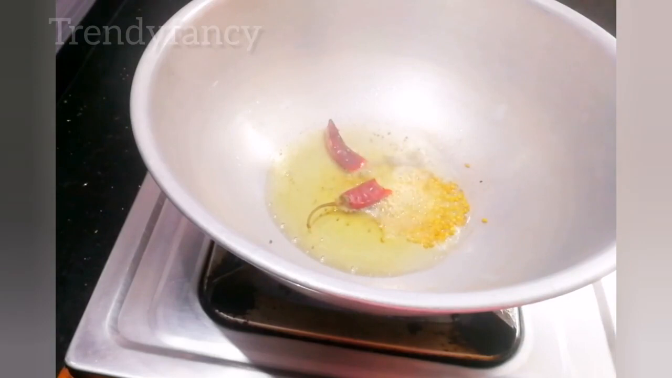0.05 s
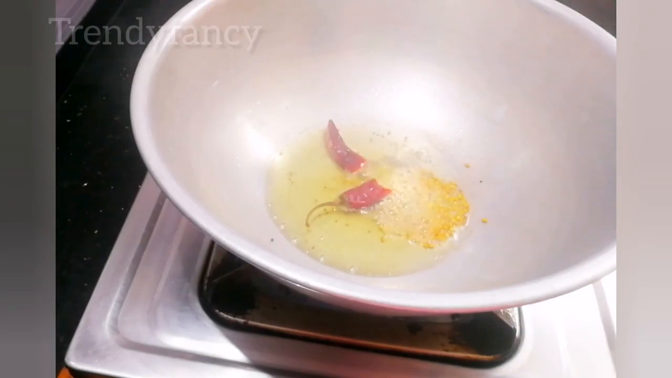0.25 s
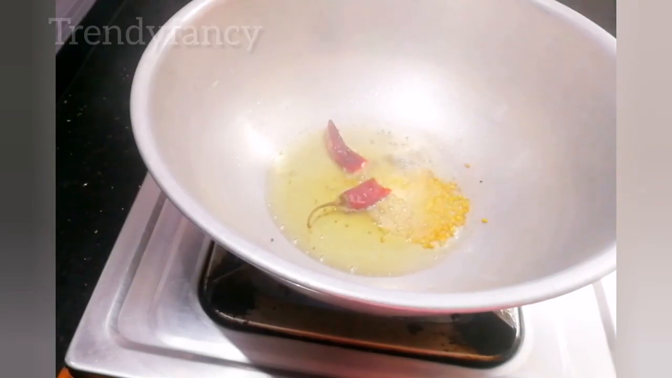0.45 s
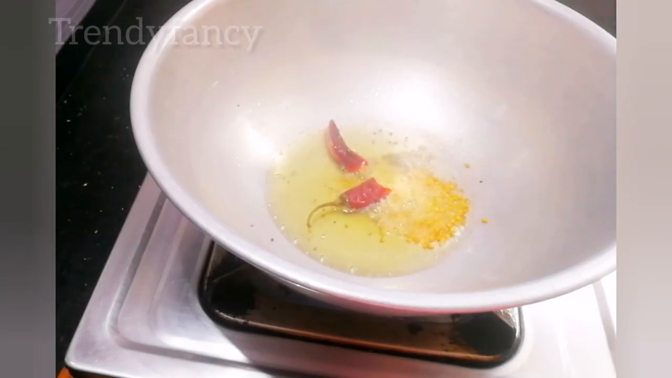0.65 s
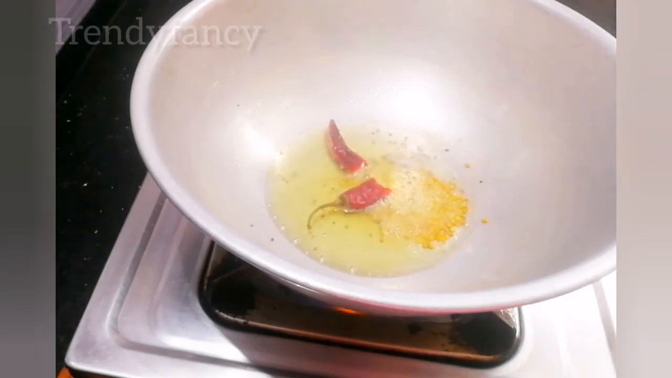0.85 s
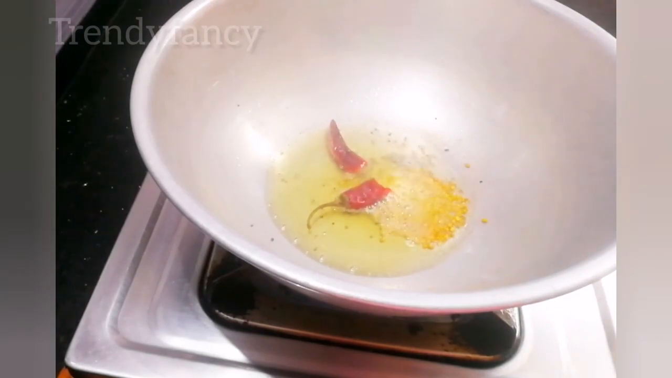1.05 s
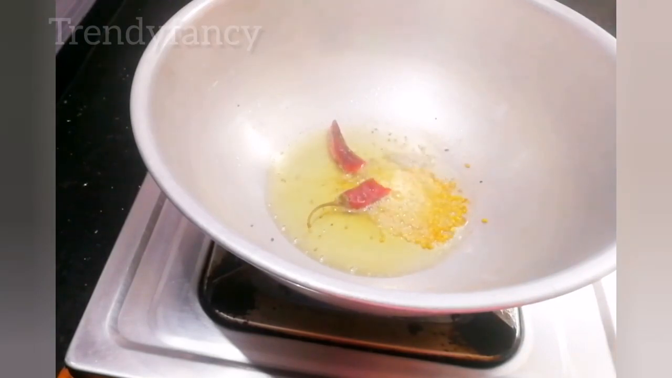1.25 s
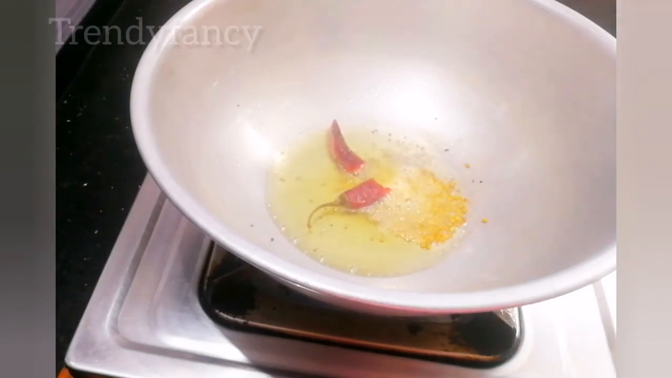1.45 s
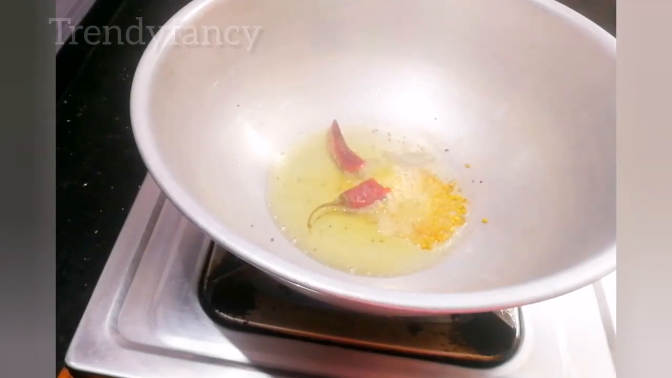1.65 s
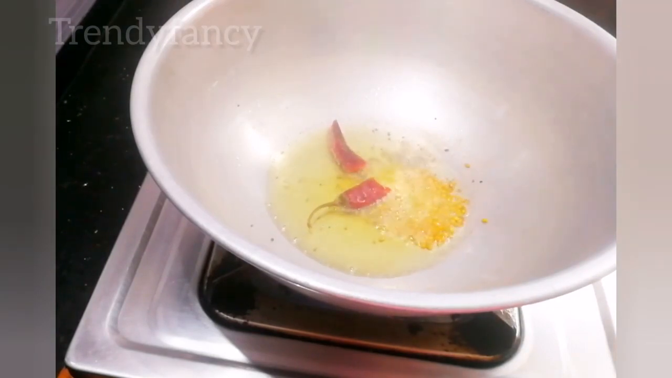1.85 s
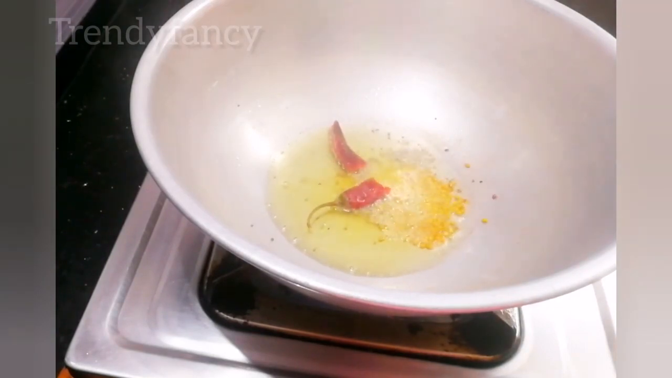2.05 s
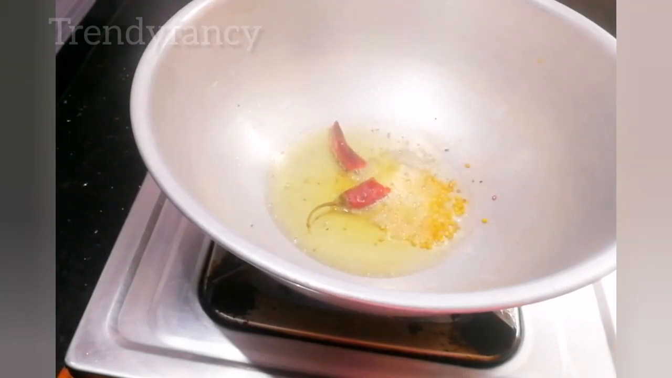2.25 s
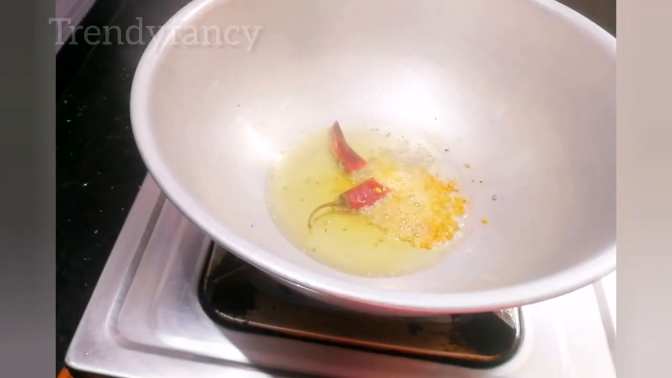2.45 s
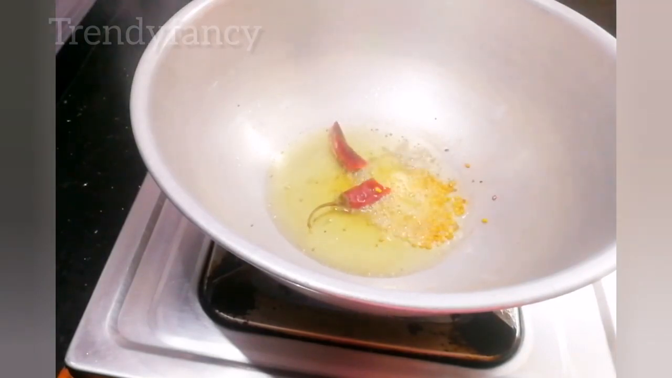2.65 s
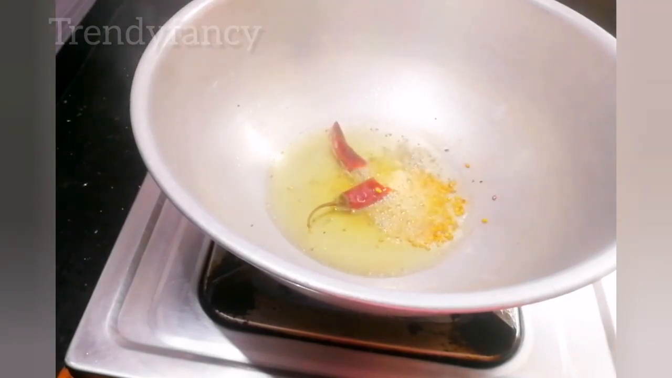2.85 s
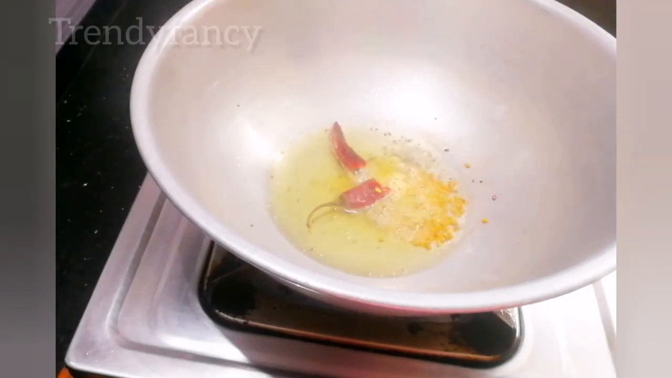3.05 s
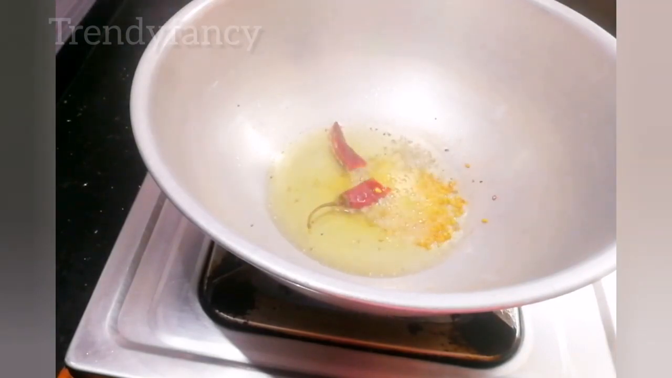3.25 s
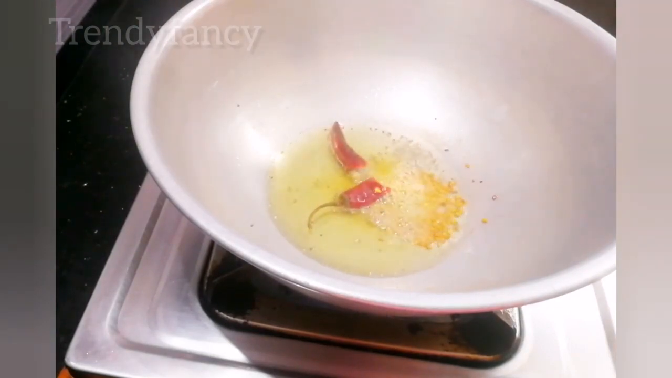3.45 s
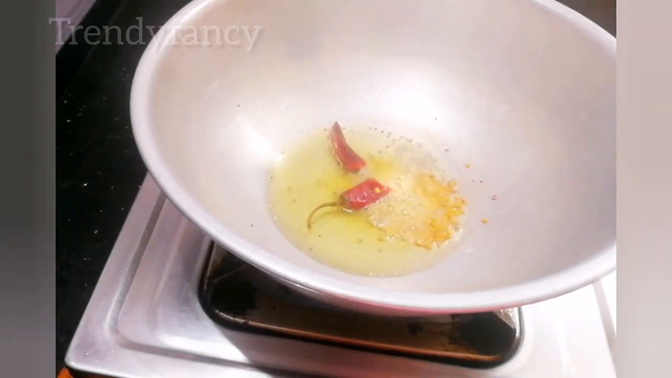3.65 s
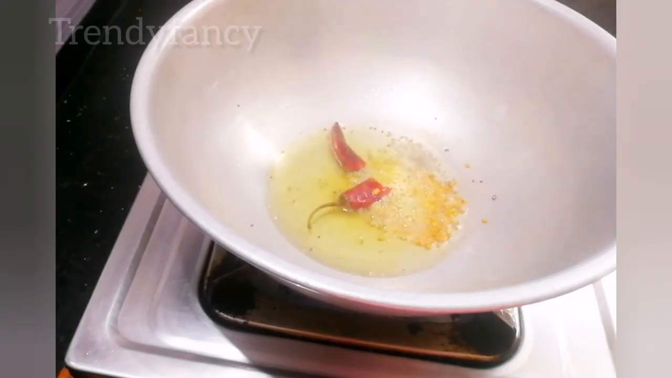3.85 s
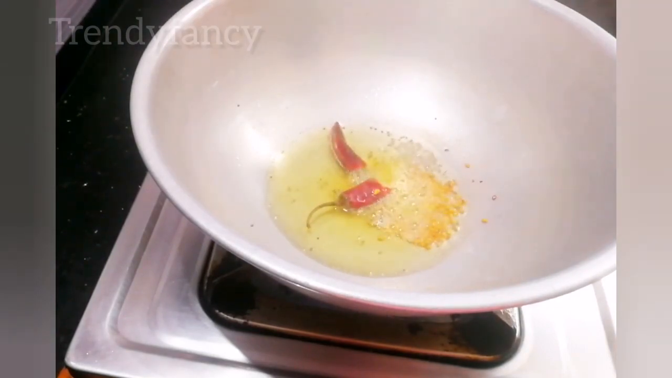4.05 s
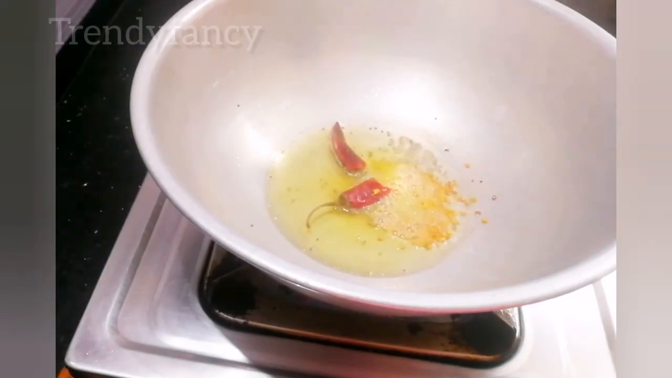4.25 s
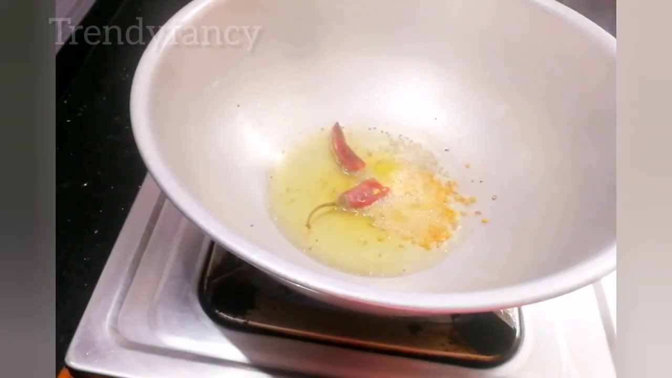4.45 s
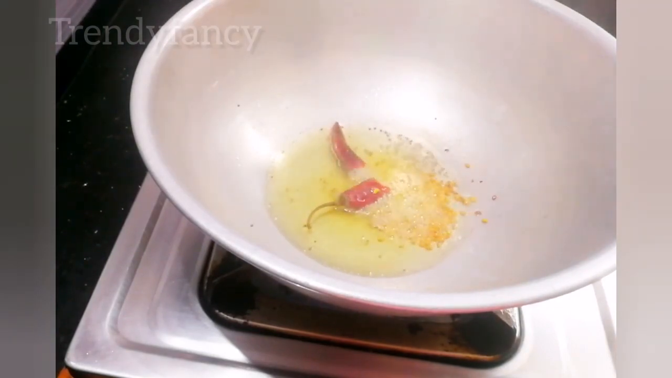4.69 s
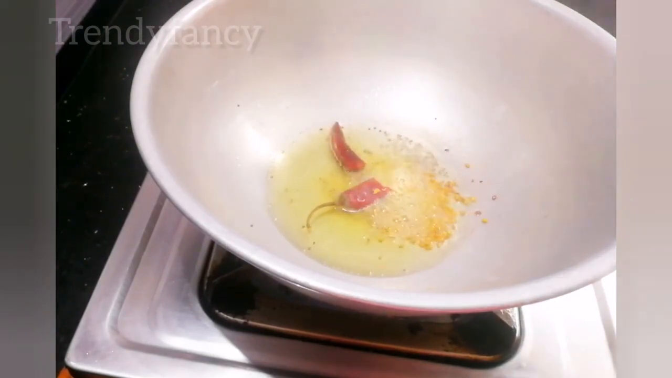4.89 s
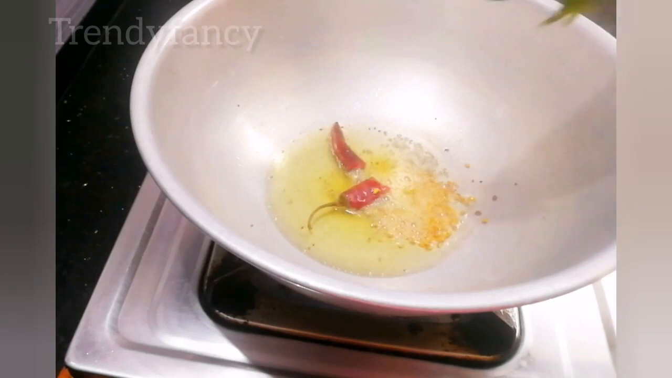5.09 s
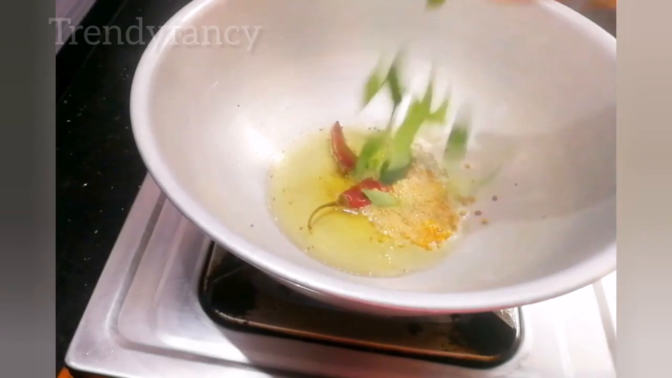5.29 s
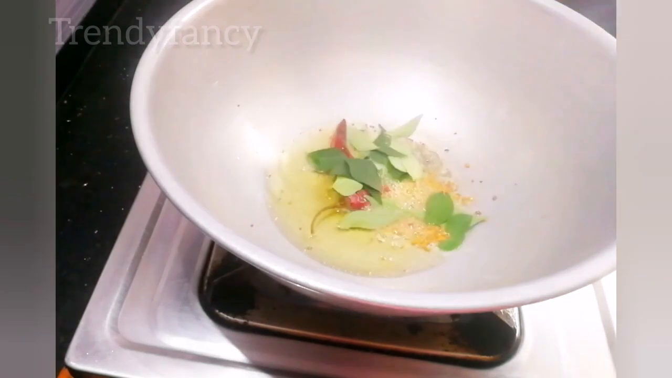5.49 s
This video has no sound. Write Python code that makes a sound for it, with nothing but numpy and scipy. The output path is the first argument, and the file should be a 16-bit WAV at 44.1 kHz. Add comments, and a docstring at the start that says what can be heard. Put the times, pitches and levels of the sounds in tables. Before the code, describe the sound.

Seeds and dried chillies fry in oil in a steel bowl pan on a kitchen stove, heard in stereo from just above. From the start, dry, very short clicks and snaps scatter irregularly, mostly bright and high, some lower and knocking, each with a brief hissy reflection from the hard room. Underneath are a very faint fine fizz, a low burner rumble and a barely audible wavering hum, clearer after 4.5 s. Small wet gurgles surface at about 0.8 and 2.8 s. Air from bigger bursts thuds at the microphone at 1.6 s, very weakly at 1.9 s, and most strongly at 3.4 s. Stronger snaps stand out near 2.4, 3.2, 4.1 and 4.9 s, with a tight cluster around 3.2 s. At 5.3 s fresh leaves land: a wet spurt, a sudden rush of hiss and dense, harder crackling continue to the abrupt end at 5.5 s.

```python
"""A fine fizz over a low burner rumble, then sharp clicks: seeds and dried chillies fry in oil in a steel bowl pan,
heard from just above. Each burst is a spike that sounds shared resonances and scatters round the bowl; the hard
kitchen answers with a bright hissing noise tail. Wet gurgles and a few thuds of air join in; at the end fresh
leaves drop in and the oil erupts. Fizz, rumble and gurgles are shaped noise; a faint hum is a wavering sine."""
import sys
import numpy as np
from scipy import signal
from scipy.fft import rfft, irfft, next_fast_len
from scipy.io import wavfile
from scipy.ndimage import uniform_filter1d

SR = 44100
rng = np.random.default_rng(int(sys.argv[2]) if len(sys.argv) > 2 else 0)


def digitize_waveform(pressure):
    """Quantize a signal to 16-bit integers and store it at the path in sys.argv[1].

    Rows of a 2-D input are taken as channels; values are limited to [-1, 1].
    """
    field = np.atleast_2d(pressure).T
    bounded = np.clip(field, -1, 1)
    quanta = np.round(bounded * 32767).astype(np.int16)
    wavfile.write(sys.argv[1], SR, quanta)


N = 243813


def amp(db):
    """Gain of a level in dB."""
    return 10 ** (np.asarray(db) / 20)


def unit(x):
    """x at rms 1."""
    return x / np.sqrt(np.mean(x ** 2) + 1e-20)


def along(points, hz):
    """Values at hz from (Hz, value) points on a log axis."""
    f, v = np.transpose(points)
    return np.interp(np.log(hz + 1), np.log(f + 1), v)


def curve(rows):
    """One value per sample from (s, value) rows."""
    return np.interp(np.arange(N) / SR, *np.transpose(rows))


def filtered(x, response):
    """x times a response of frequency."""
    m = next_fast_len(N + SR // 2)
    spectrum = rfft(x, m) * response(np.fft.rfftfreq(m, 1 / SR))
    return irfft(spectrum, m)[..., :N]


def half_angle(alike, hz):
    """Mid-side mixing angle whose cos and sin gains give the left-right correlation."""
    return np.arccos(np.clip(along(alike, hz), -1, 1)) / 2


def coloured(pair, spectrum, alike):
    """Two unrelated signals given a spectrum and the left-right likeness, rms 1."""
    def response(hz):
        turn = half_angle(alike, hz)
        return amp(along(spectrum, hz)) * np.array([np.cos(turn), np.sin(turn)])

    mid, side = filtered(pair, response)
    return unit(np.array([mid + side, mid - side]))


# Fizz level. Each row: time in seconds, level in dB.
FIZZ_LEVEL = [(0, -55.5), (1, -60.5), (2, -56.5), (3, -54.5), (4, -62), (5, -58.5), (5.32, -55),
              (5.35, -43), (5.44, -35.5), (5.53, -36)]
# Fizz spectrum. Each row: frequency in Hz, relative level in dB per Hz.
FIZZ_SPECTRUM = [(300, -53), (600, -7), (1150, -8.5), (2200, -9), (3600, -7), (6400, -13), (9800, -0.5),
                 (13000, -7.5), (15200, -10), (16500, -12)]
# Stereo likeness of fizz and room tails. Each row: frequency in Hz, left-right correlation.
DIFFUSE_ALIKE = [(30, 0.28), (150, 1), (300, 1), (600, 0), (1500, 0), (4000, 0.061), (12000, 0)]
SPIKE_CHANCE = .004  # per sample


def fizz():
    """Countless tiny bubbles: sparse spikes of uneven size on a smooth hiss."""
    size = amp(5 * np.minimum(rng.exponential(size=(2, N)), 3))
    spikes = (rng.random((2, N)) < SPIKE_CHANCE) * size * rng.choice([-1, 1], (2, N))
    bubbles = rng.standard_normal((2, N)) + .6 * unit(spikes)
    z = signal.stft(bubbles, nperseg=512)[2]
    # the simmer comes and goes in patches of pitch and time
    patches = uniform_filter1d(rng.standard_normal(z.shape[1:]), 6, axis=0)
    patches = uniform_filter1d(patches, 8, axis=1)
    simmer = signal.istft(z * amp(4.5 * unit(patches)), nperseg=512)[1][:, :N]
    return amp(curve(FIZZ_LEVEL)) * coloured(simmer, FIZZ_SPECTRUM, DIFFUSE_ALIKE)


# Rumble level. Each row: time in seconds, level in dB.
BURNER_LEVEL = [(0, -65), (1, -63), (3, -62), (4.5, -64), (4.7, -60.5), (5.53, -60.5)]
# Rumble spectrum without standing waves. Each row: frequency in Hz, relative level in dB per Hz.
BURNER_SPECTRUM = [(12, -37), (20, -1.5), (38, -8), (80, 2.5), (131, -2.5), (172, -0.5), (380, -5),
                   (576, -11.5), (1050, -24.5), (1190, -9.5), (1500, -63), (1950, -70), (3300, -120)]
# Stereo likeness of the rumble. Each row: frequency in Hz, left-right correlation.
RUMBLE_ALIKE = [(30, .88), (120, .8), (190, .6), (280, -.3), (500, .1), (1200, .5)]
# Standing waves of the room. Each row: centre in Hz, width in Hz, added gain in dB.
STANDING_WAVES = [(57.5, 5, 2.5), (87, 2.6, -1.5), (143, 9.4, 3), (172.2, 4.5, 5.5), (197.3, 2.3, 5.5)]
# Hum level. Each row: time in seconds, level in dB.
HUM_LEVEL = [(0, -78), (.75, -70), (.9, -114), (4.5, -70), (4.65, -70.5), (5.53, -69)]
HUM_HZ, HUM_WAVER_HZ = 90.6, 0.54  # centre, rms deviation


def burner():
    """The gas flame and the house rumble low, louder at the room's standing waves; a hum wavers in it."""
    def lift(hz):
        return 1 + sum(amp(db) / (1 + (2 * (hz - centre) / width) ** 2) for centre, width, db in STANDING_WAVES)

    noise = filtered(rng.standard_normal((2, N)), lift)
    rumble = coloured(noise, BURNER_SPECTRUM, RUMBLE_ALIKE)
    waver = unit(uniform_filter1d(rng.standard_normal(N), size=SR // 3))
    phase = 2 * np.pi * np.cumsum(HUM_HZ + HUM_WAVER_HZ * waver) / SR
    hum = np.sqrt(2) * np.sin(phase)
    return amp(curve(BURNER_LEVEL)) * rumble + amp(curve(HUM_LEVEL)) * hum


def ring(modes, t, sharp):
    """Impulse answer of a group of resonances, each applied twice for steep flanks; peak 1."""
    y = 0
    for hz, width_hz, db in modes:
        envelope = width_hz * t * np.exp(-np.pi * width_hz * t / sharp)
        y = y + amp(db) * envelope * np.cos(2 * np.pi * hz * t)
    return y / np.abs(y).max()


# Resonances in groups: treble crack, snap, bowl ring, knock, hollow ring.
# Each row in a group: frequency in Hz, width in Hz, relative level in dB.
RESONANCE_GROUPS = [
    [(9870, 2600, 20), (13900, 1200, -36.5), (8340, 1070, -0.5)],
    [(6080, 1900, 14.5), (5093, 690, 5.5)],
    [(3504, 483, 11), (3110, 610, -12.5)],
    [(2310, 860, -1)],
    [(1120, 240, -12.5), (1182, 160, 4.5), (749, 146, -3)],
]


def ring_groups(t, shift, sharp):
    """Impulse answers of all groups, one a row, with each group's pitch times its shift."""
    return np.array([ring(modes, t * x, sharp) for modes, x in zip(RESONANCE_GROUPS, shift)])


# Decay of the kitchen. Each row: frequency in Hz, t60 in seconds.
KITCHEN_T60 = [(500, 0.49), (1500, 0.45), (4000, 0.32), (9000, 0.47), (15000, 0.35)]
# Colour of the room tail. Each row: frequency in Hz, relative level in dB.
TAIL_COLOUR = [(300, -17.5), (1200, -11), (3500, 0.5), (6000, 6.5), (10000, 3), (12500, -1), (15000, -3)]


def kitchen(count):
    """Diffuse room answers that build up over 12 ms and die by frequency."""
    hz, t, z = signal.stft(rng.standard_normal((count, 2, SR // 2)), SR, nperseg=256)
    turn = half_angle(DIFFUSE_ALIKE, hz)[:, None]
    mid, side = np.cos(turn) * z[:, 0], np.sin(turn) * z[:, 1]
    z = np.stack([mid + side, mid - side], axis=1)
    t60 = np.clip(along(KITCHEN_T60, hz), .05, 2)[:, None]
    z = z * amp(along(TAIL_COLOUR, hz)[:, None] - 60 * t / t60)
    tail = signal.istft(z, SR, nperseg=256)[1][..., :SR // 2]
    # single reflections stand out of the wash: the level is grainy at the scale of a millisecond
    grain = unit(uniform_filter1d(rng.standard_normal((count, 1, SR // 2)), size=40))
    tail = tail * amp(3 * grain)
    tail = tail / np.sqrt(np.mean(tail[..., SR // 100:SR // 30] ** 2))
    build_up = np.clip(np.arange(SR // 2) / SR / .012, .3, 1) ** .8
    return tail * build_up


CRACKLES_PER_S = 5
CRACKLE_DB, CRACKLE_SPREAD_DB, CRACKLE_TAIL_DB = -47, 2, -22  # strength, +- range, tail relative to strength
# highest pitch, mean drop below it, dB per octave away from the pitch
CRACKLE_TOP_HZ, CRACKLE_DROP_OCTAVES, CRACKLE_NARROW_DB = 9600, .6, 5


def crackles():
    """Rows like those of BURSTS for small bursts at chance moments."""
    s, size, drop, side = rng.random((round(CRACKLES_PER_S * N / SR), 4)).T
    db = CRACKLE_DB + CRACKLE_SPREAD_DB * (2 * size - 1)
    hz = CRACKLE_TOP_HZ * 2 ** (CRACKLE_DROP_OCTAVES * np.log(1 - drop))
    narrow_db = np.full(len(s), CRACKLE_NARROW_DB)
    return list(zip(s * N / SR, db, hz, narrow_db, 8 * side - 3, db + CRACKLE_TAIL_DB))


# First echoes off near surfaces. Each row: delay after the burst in seconds, level in dB.
NEAR_ECHOES = [(.0105, -25), (.0127, -27), (.0143, -28)]
SCATTER_START_DB, SCATTER_T60_S = -21, .013


def scatter(t):
    """A spike's arrivals at each port: direct, copies off the bowl wall, echoes off near surfaces."""
    # the bowl's dents scatter the treble most: differenced noise
    shared = np.diff(rng.standard_normal(len(t) + 1))
    own = np.diff(rng.standard_normal((2, len(t) + 1)))
    decay = amp(SCATTER_START_DB - 60 * t / SCATTER_T60_S) * (t > .0003)
    push = decay * (.6 * shared + .8 * own)
    push[0, 1] = push[1, 0] = 1  # the right port is a hair nearer
    for delay_s, db in NEAR_ECHOES:
        # smeared over 12 samples, differently at each port
        push[:, round(delay_s * SR):][:, :12] += amp(db) * np.diff(rng.standard_normal((2, 13)))
    return push


# Bursts. Each row: start in seconds, strength in dB, pitch in Hz, narrowness in dB per octave away from
# the pitch (negative plays as 0), left over right in dB, room tail in dB.
BURSTS = [(0.0174, -24.5, 4100, 8, 2, -50), (0.0353, -41.5, 9500, 0, 6, -48),
          (0.0463, -34, 9630, 9, 1, -66), (0.0924, -20.5, 5500, 27, -1, -53),
          (0.1166, -32, 5280, 5, -3, -58), (0.1215, -21.5, 9630, 27, 1, -42),
          (0.18, -27, 6200, 20, -2, -55), (0.265, -21, 9630, 12, -2, -48), (0.281, -20.5, 9630, 11, 1, -54),
          (0.3162, -28.5, 8300, 3, 0, -44.5), (0.3696, -20.5, 5600, 18, 5, -47.5),
          (0.3741, -28, 9630, 15, -3, -47), (0.4454, -40, 5100, 3, -2, -48),
          (0.451, -20, 9700, 7, 2, -43.5), (0.4665, -30, 8900, 6, -1, -52), (0.4771, -28, 9630, 9, 4, -58),
          (0.5882, -20.5, 4600, 9.5, 1, -45.5), (0.6505, -30, 9630, 16, -4, -55),
          (0.6893, -19.5, 9630, 13.5, 0, -49.5), (0.7574, -25.5, 9630, 6, 0, -45),
          (0.803, -35, 1260, 5, 6, -51), (0.8531, -41, 9630, 8, 1, -57), (0.8677, -22, 9700, 4.5, 6, -42.5),
          (0.8724, -28, 9200, 3.5, -12, -47), (0.9817, -35, 9200, 4.5, -1, -54.5),
          (1.0283, -45, 9630, 26, 1, -45.5), (1.0383, -16, 7400, 15, 0, -52.5),
          (1.1047, -33, 6970, 10, 3, -57), (1.1677, -40, 9630, 2.5, 1, -58),
          (1.2247, -22, 9630, 16.5, -2, -47.5), (1.3368, -26, 3980, 6.5, 1, -46),
          (1.3541, -33, 9630, 4.5, 8, -49), (1.4398, -38, 3650, 6, 3, -60),
          (1.4908, -25, 9630, 5.5, -3, -46), (1.5517, -30, 9630, 4, -1, -53),
          (1.5809, -24.5, 9630, 13, 1, -55), (1.5916, -42, 9630, 17, 6, -44.5),
          (1.6034, -19, 9630, 6.5, 5, -44), (1.6419, -29, 9630, 4.5, 3, -45.5),
          (1.6913, -25, 5700, 9.5, 4, -49), (1.6968, -31, 3650, 11, -7, -53),
          (1.7597, -32, 8700, 5, 1, -56), (1.7863, -23.5, 8200, 10.5, 2, -48.5),
          (1.8206, -18, 7100, 21, 4, -50.5), (1.9433, -25, 9900, 2, 4.5, -41.5),
          (1.9979, -26, 9630, 13.5, 5, -50.5), (2.0488, -29, 8200, 2.5, 0, -47.5),
          (2.0647, -44, 9630, -3, 1, -55), (2.118, -27, 4740, 7.5, 8, -46),
          (2.1808, -27, 9630, 21, -5, -48), (2.1901, -35.5, 9630, 1, -4, -60),
          (2.2274, -29, 9630, 7.5, -9, -51), (2.2779, -17, 7100, 17.5, -1, -46),
          (2.3026, -25.5, 7240, 10, -2, -56), (2.3392, -27, 9100, 10, 1, -55),
          (2.374, -13, 5200, 8.5, -2, -40.5), (2.4572, -29, 3600, 3.5, -2, -41),
          (2.464, -26.5, 9630, 18, 1, -53), (2.4968, -23.5, 3620, 9, 1, -48.5),
          (2.5142, -30, 9630, 6, 3, -72), (2.5993, -26.5, 5280, 5, 0, -46.5),
          (2.6354, -29, 9630, 4.5, -2, -54), (2.7131, -36.5, 9630, 8, 1, -61),
          (2.7484, -17.5, 8160, 8.5, 3, -42.5), (2.8329, -29.5, 3500, 4, -1, -49),
          (2.8609, -25, 9630, 11, 5, -46.5), (2.886, -32, 3820, 5, -1, -62), (2.9083, -29, 9630, 4, 2, -61),
          (2.9201, -50, 8700, 1, -1, -40.5), (2.9416, -23.5, 8200, 2.5, 3, -54.5),
          (3.0216, -28.5, 9800, 4.5, 3, -51), (3.1082, -26, 6200, 19, 2, -55.5),
          (3.1183, -31, 9630, 8, 9, -52), (3.2233, -13, 4080, 19, 1, -45.5),
          (3.2302, -31, 4000, 24, 1, -61), (3.2375, -27, 3460, 5, -3, -62),
          (3.2438, -23.5, 9630, 11, 11, -41), (3.2715, -22.5, 4560, 10, 1, -50),
          (3.2756, -30, 6070, 12, 2, -48), (3.282, -24, 5070, 13, 1, -57),
          (3.3602, -18.5, 5440, 15, 1, -46.5), (3.4102, -15, 4200, 12.5, 1.5, -51.5),
          (3.4383, -19.5, 9400, 9, -3, -38.5), (3.4904, -19.5, 8200, 6.5, -0.5, -41.5),
          (3.5409, -23, 7100, 16, -5, -47.5), (3.5924, -24.5, 3730, 9.5, -2, -47.5),
          (3.6071, -29, 6650, 10, -5, -49.5), (3.6716, -17, 7000, 31, 0, -47.5),
          (3.7726, -26, 9630, 7, 0, -44.5), (3.7952, -25.5, 9800, 5, 1, -49.5),
          (3.8729, -25.5, 9100, 9, -1, -51), (3.9316, -24, 9800, 6, 2.5, -45),
          (3.956, -41, 9630, -6, 2, -53), (3.969, -26, 6850, 14, 4, -54),
          (4.0603, -34.5, 8780, 3.5, 0, -55), (4.0953, -40, 9630, 6, 1, -77),
          (4.1192, -28, 9630, 3, -3, -45), (4.1297, -10, 4950, 20.5, 4, -46),
          (4.2192, -24, 5560, 14, 7, -55), (4.2424, -23.5, 9630, 4.5, 4, -46),
          (4.3037, -25, 7300, 7, 1, -44.5), (4.3178, -20.5, 7700, 9.5, 0, -49),
          (4.3428, -25.5, 7300, 4.5, 1, -48), (4.415, -39.5, 9600, 1, 1, -55),
          (4.4471, -23.5, 9700, 5.5, 4, -47), (4.4958, -30, 9630, 3, 0, -46),
          (4.5164, -29, 7450, 14, -3, -55), (4.5517, -35, 4500, 21, 1, -49),
          (4.5643, -19, 9500, 9, -2, -43.5), (4.6099, -30, 9630, 9, -1, -60),
          (4.7517, -25, 9850, 11, -2, -51), (4.8205, -28, 6800, 11, -4, -54.5),
          (4.9095, -14.5, 9300, 8.5, -1, -38), (4.9689, -27, 7400, 14, 1, -54.5),
          (5.0005, -45, 9630, 2, -4, -53), (5.0572, -39, 8000, 9, 1, -61),
          (5.0803, -17, 8360, 35, -1, -45.5), (5.0893, -41, 9630, 16, 0, -57),
          (5.1169, -44, 8380, 15, -1, -47.5), (5.1323, -13.5, 7500, 22, -1, -46.5),
          (5.2093, -29.5, 9630, 5, 0, -46.5), (5.3176, -37, 9630, 13, 1, -57),
          (5.3256, -18.5, 970, 5.5, 1, -34), (5.3284, -22.5, 9700, 10, 2, -47),
          (5.343, -13.5, 9630, 7, 1.5, -42), (5.3483, -17.5, 4810, 4, -1, -36),
          (5.3579, -11.5, 4460, 12.5, -2, -35.5), (5.3685, -17.5, 4850, 6, -4, -46),
          (5.3743, -17.5, 7640, 1.5, 0, -43), (5.3958, -16.5, 9630, 7, -4, -36.5),
          (5.4001, -14, 9630, 4.5, 3, -54), (5.4077, -40, 9630, 8, -1, -62),
          (5.4122, -24, 9630, 6, -3, -65), (5.4151, -23, 9630, 1, 4, -44), (5.4599, -24, 9630, 1, 6, -54),
          (5.4652, -24, 9630, 5, -1, -58), (5.4719, -29, 2640, 8, -3, -42.5),
          (5.4974, -37, 9630, 0, 0, -48), (5.5012, -19, 5400, 9, 9, -42), (5.5068, -25, 9630, 2, -3, -45),
          (5.5176, -24, 9630, 1, 10, -50), (5.528, -14, 3450, 2.5, 1, -46)]
# Centre of each resonance group, in Hz.
GROUP_CENTRES_HZ = np.array([9630, 6030, 3610, 2136, 1105])
# How readily each resonance group sounds, in dB.
GROUP_GAINS_DB = np.array([3.5, -2, -8, -11.5, -12.5])
# Lift of each resonance group as water bursts under the leaves, in dB: the low groups sound harder.
WET_LIFT_DB = np.array([0, 0, 2, 4, 3])
LEAVES_S = 5.32  # the wet leaves touch the oil
CHANCE_DB = 2  # sd of how hard a burst sounds each group
PITCH_SD, PULL = .04, .08  # chance shift, most pull toward the burst's own pitch; both in log frequency
BLUR = 0.48  # sharpness of the resonances in the room tail


def pops():
    """Each burst is one spike and its scattered copies off the bowl wall, sounding the resonances."""
    rooms, out = kitchen(count=12), np.zeros((2, N + SR))
    t = np.arange(SR // 40) / SR
    for k, (s, strength_db, hz, narrow_db, pan_db, room_db) in enumerate([*BURSTS, *crackles()]):
        # each burst's resonances shift a little by chance, and lean toward its own pitch
        pull = PULL * np.tanh(4 * np.log(hz / GROUP_CENTRES_HZ))
        shift = np.exp(rng.normal(0, PITCH_SD, len(RESONANCE_GROUPS)) + pull)
        # a burst sounds most the resonances near its own pitch
        octaves_away = abs(np.log2(GROUP_CENTRES_HZ / hz))
        dbs = strength_db + GROUP_GAINS_DB - max(narrow_db, 0) * octaves_away
        dbs = dbs + WET_LIFT_DB * (s > LEAVES_S) + rng.normal(0, CHANCE_DB, len(GROUP_GAINS_DB))
        sides = rng.choice([-1, 1], len(dbs))  # each group starts with a push or a pull
        spike = (sides * amp(dbs)) @ ring_groups(t, shift, sharp=1.0)
        direct = signal.fftconvolve(scatter(t), spike[None], axes=1)[:, :len(t)]
        at = round((s - .0001) * SR)
        out[:, at:at + len(t)] += direct * amp([[pan_db / 2], [-pan_db / 2]])
        # summed over all directions the bowl's resonances are blurred
        blurred = amp(dbs) @ ring_groups(t, shift, sharp=BLUR)
        blurred = blurred / np.linalg.norm(blurred)
        echo = signal.fftconvolve(blurred[None], rooms[k % len(rooms)], axes=1)
        out[:, at:at + echo.shape[1]] += amp(room_db) * echo
    # so small a source radiates no bass
    highpass = signal.butter(3, 600, "high", fs=SR, output="sos")
    return signal.sosfilt(highpass, out[:, :N])


# Wet bubbling spurts. Each row: start in seconds, time to fall 14 dB in seconds, level in dB.
SPURTS = [(0.799, 0.062, -55), (2.805, 0.07, -54.5), (5.324, 0.029, -44), (5.35, 0.14, -50.5)]
# Gurgle spectrum. Each row: frequency in Hz, relative level in dB per Hz.
GURGLE_SPECTRUM = [(400, -65), (700, -10), (1080, 17), (1200, -7), (1500, 12), (2200, 9.5), (3000, -19),
                   (5000, -50)]


def gurgles():
    """Steam pushes out from under the oil in short low spurts that start fast and fade."""
    t, gate = np.arange(N) / SR, np.zeros(N)
    for s, fall_s, db in SPURTS:
        fade_db = 14 * np.clip((t - s) / fall_s, 0, 9) ** 2
        gate += amp(db - fade_db) * (t > s)
    noise = coloured(rng.standard_normal((2, N)), GURGLE_SPECTRUM, [(1000, 0.33)])  # one likeness at all pitches
    return uniform_filter1d(gate, 90) * noise


# Big bursts that push air at the microphone. Each row: start in seconds, level in dB.
AIR_BURSTS = [(1.6029, -30.5), (1.9429, -43.5), (3.4383, -23)]
BLAST, BLAST_S = 2.45, 0.00004  # height relative to the suck, time constant
SUCK_S, REBOUND, REBOUND_S = 0.0018, 0.079, 0.02  # time constant; height relative to the suck, time constant


def thuds():
    """A sharp blast of air, then a suck that relaxes in a few ms and a slow rebound, same shape at both ports."""
    out, t = np.zeros(N + SR), np.arange(SR // 10) / SR
    blast = np.exp(-t / BLAST_S)
    suck = np.exp(-t / SUCK_S) - REBOUND * np.exp(-t / REBOUND_S)
    push = BLAST * blast - (1 - blast) * suck
    for s, db in AIR_BURSTS:
        out[round(s * SR):][:len(t)] += amp(db) * push
    return out[:N] * amp([[.6], [-.6]])  # left a little louder


def scene():
    """Everything at the two microphone ports."""
    return fizz() + burner() + pops() + gurgles() + thuds()


# Treble roll-off of the microphone. Each row: frequency in Hz, gain in dB.
MICROPHONE_RESPONSE = [(11000, -1), (14000, -0.5), (15500, -6), (16600, -21)]
BAND_LIMIT_HZ = 16670


def record(dry):
    """The left port is a little louder; the treble rolls off and nothing is kept above the band limit."""
    ports = dry * amp([[.4], [-.4]])
    return filtered(ports, lambda hz: amp(along(MICROPHONE_RESPONSE, hz)) * (hz < BAND_LIMIT_HZ))


dry = scene()
out = record(dry)
digitize_waveform(out)
```